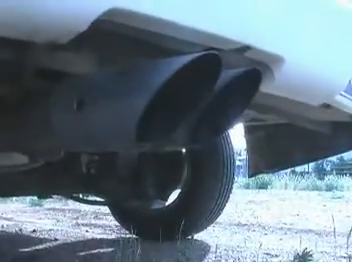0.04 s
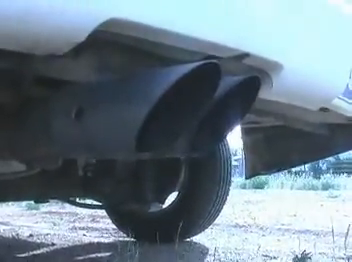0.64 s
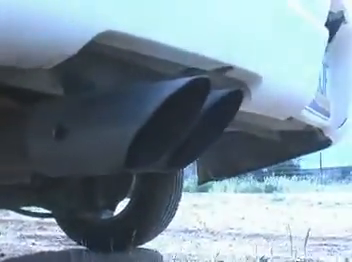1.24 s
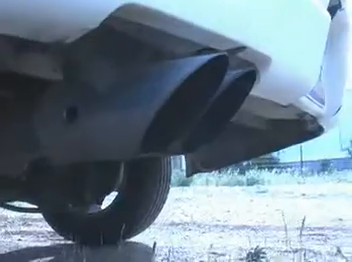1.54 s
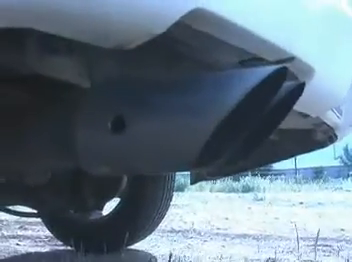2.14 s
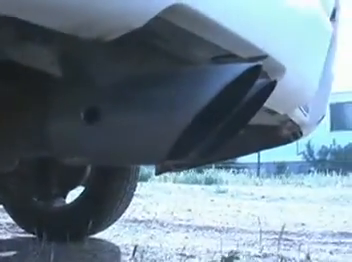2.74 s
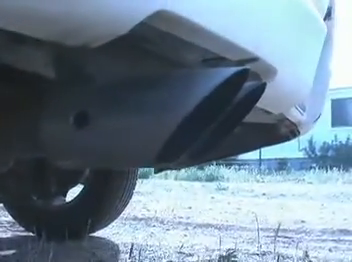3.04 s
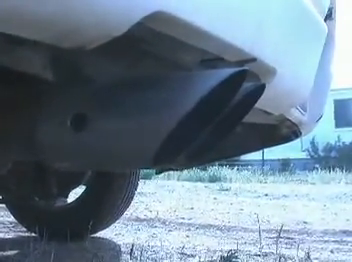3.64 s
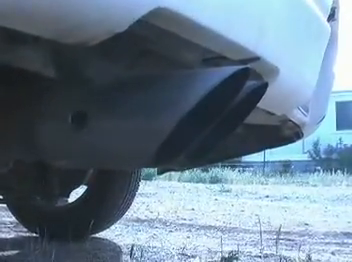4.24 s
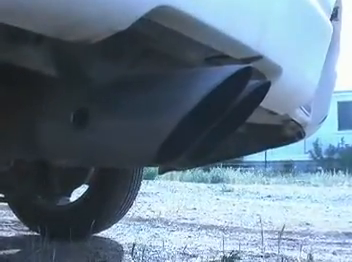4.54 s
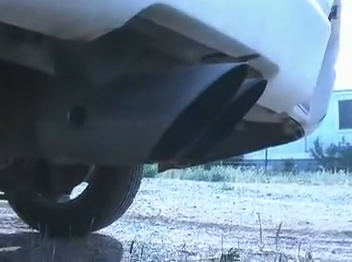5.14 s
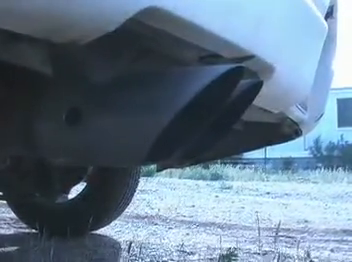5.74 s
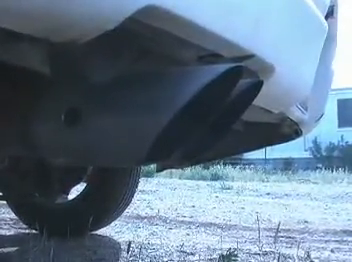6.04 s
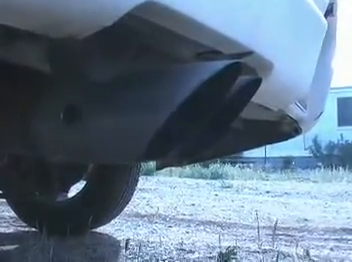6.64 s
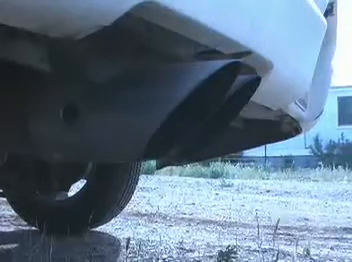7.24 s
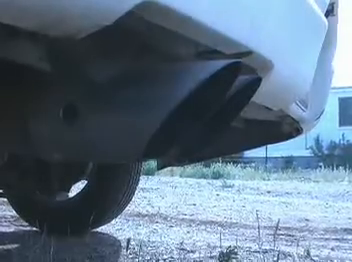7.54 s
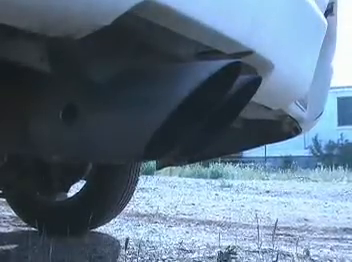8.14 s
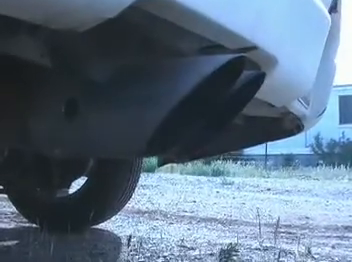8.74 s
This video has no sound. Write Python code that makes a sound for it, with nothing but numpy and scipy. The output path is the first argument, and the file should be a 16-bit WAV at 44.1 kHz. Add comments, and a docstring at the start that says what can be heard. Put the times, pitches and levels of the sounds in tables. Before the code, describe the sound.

A car idles close to its exhaust, loping with sputters and thumps, then surges and settles into an even low drone.

```python
"""A four-cylinder car idles, heard beside its twin tail pipes: each firing is a pressure pulse that
drives the resonances of pipes and silencer. For four seconds it lopes: each misfire spits gas, and the
next firing burns the leftover fuel with a thump; the heaviest overload the microphone. Then the engine
catches, surges and sinks back. The gas hisses faintly, then hard near 5.2 s and 6.6 s. At last it
settles into an even drone with rare misfires, one cylinder ringing the silencer on every cycle."""
import sys
import numpy as np
from scipy import signal
from scipy.fft import rfft, irfft
from scipy.io import wavfile
from scipy.ndimage import uniform_filter1d

SR = 44100
rng = np.random.default_rng(int(sys.argv[2]) if len(sys.argv) > 2 else 0)


def store_wav(level_fs):
    """Save 16-bit WAV to argv[1]."""
    pcm = np.round(np.clip(np.atleast_2d(level_fs), -1, 1) * 32767)
    wavfile.write(sys.argv[1], SR, pcm.T.astype(np.int16))


N = 396018
TIME = np.arange(N) / SR


def undb(db):
    """Amplitude ratio of a level in decibels."""
    return 10 ** (np.asarray(db) / 20)


def unit(x):
    """Normalisation to rms 1."""
    return x / np.sqrt(np.mean(x ** 2))


def steady(x):
    """Normalisation to rms 1 over a sliding half second."""
    return x / np.sqrt(uniform_filter1d(x ** 2, size=SR // 2) + 1e-18)


def cut(x, hz, kind, order):
    """Butterworth low-pass or high-pass."""
    return signal.sosfilt(signal.butter(order, hz, kind, fs=SR, output="sos"), x)


def resonate(x, modes):
    """Superposition of damped modes (frequency [Hz], bandwidth [Hz], gain [dB])."""
    return sum(undb(db) * signal.lfilter(*signal.iirpeak(hz, hz / width, fs=SR), x)
               for hz, width, db in modes)


def coloured(x, response, size=16384):
    """Minimum-phase filter (frequency [Hz], gain [dB]), falling 12 dB an octave past its last point."""
    f = np.maximum(np.arange(size // 2 + 1) * SR / size, 1)
    hz, db = np.transpose(response)
    gain = undb(np.interp(np.log(f), np.log(hz), db)) / np.maximum(f / hz[-1], 1) ** 2
    cepstrum = irfft(np.log(gain))
    cepstrum[1:size // 2] *= 2
    cepstrum[size // 2 + 1:] = 0
    return signal.fftconvolve(x, irfft(np.exp(rfft(cepstrum))))[:N]


def impulses(times, sizes):
    """An impulse train."""
    train = np.zeros(N)
    inside = (times >= 0) & (times < (N - 1) / SR)
    np.add.at(train, (times[inside] * SR).astype(int), sizes[inside])
    return train


def swell(train, rise_s, fall_s):
    """Convolution turns each impulse into a gust that rises and decays exponentially."""
    t = TIME[:SR // 5]
    shape = (1 - np.exp(-t / rise_s)) ** 2 * np.exp(-t / fall_s)
    return signal.fftconvolve(train, shape / shape.max())[:N]


def bursts(times, sizes, length_s):
    """Raised-cosine envelopes of flow that start at the given times."""
    return signal.fftconvolve(impulses(times, sizes), np.hanning(int(length_s * SR)))[:N]


# Stages of the scene: loping, loping with a louder rasp, surging, sinking back, a little faster, even idle.
# (start [s], lope [0-1], cylinder imbalance [0-1], long pipe's share of the boom's power [0-1], boom [dB],
# silencer ring [dB], rasp [dB], gas flow [dB], sputter [dB])
STAGES = [(0, 0.79, 0, 0.26, -12.1, -22, -40, -44.5, -53),
          (1.1, 0.86, 0, 0.22, -11, -22.5, -36.5, -45, -54),
          (3.979, 0.1, .08, 0.19, -12, -22, -35.5, -47, -50),
          (4.751, 0.5, 0.49, 0.45, -13, -19.5, -35, -46, -57),
          (6.12, 0.19, 0.64, 0.59, -11, -21.5, -34, -47.5, -53.5),
          (6.901, 0.11, .62, 0.52, -13, -19, -36, -46, -54.5)]
def stage(name, at=TIME, blend_s=0.19):
    """One setting of the running state, interpolated linearly across each transition."""
    start, *columns = np.transpose(STAGES)
    names = ["lope", "imbalance", "pipe_share", "boom", "ring", "rasp", "gas", "sputter"]
    edges = (start[1:, None] + blend_s * np.array([-.5, .5])).ravel()
    return np.interp(at, edges, np.repeat(columns[names.index(name)], 2)[1:-1])


THUMP_DELAY_S = .0415  # from a misfire to the firing that burns the leftover fuel
# Engine speed once it has caught: (time [s], firing rate [Hz])
FIRING_RATE = [(3.9, 28.09), (4.1, 34.42), (4.5, 36.51), (4.75, 34.97), (5.45, 29.75), (5.95, 30.9),
               (6.3, 32.64), (6.7, 32.36), (7.1, 31.48), (7.8, 30.47), (8.25, 31.45), (8.98, 30.86)]
def firing_times(catch_s=3.902, lope_hz=29.3):
    """Loping firings fill the gaps between thumps; after the catch, phase is the integral of rate."""
    thumps = np.array(MISFIRES)[:, 0] + THUMP_DELAY_S
    marks = np.concatenate([[0], thumps[thumps < catch_s], [catch_s]])
    loping = np.concatenate([np.linspace(a, b, max(round((b - a) * lope_hz), 1), endpoint=False)
                             for a, b in zip(marks, marks[1:])])
    running = TIME[TIME >= catch_s]
    fired = np.cumsum(np.interp(running, *np.transpose(FIRING_RATE))) / SR
    times = np.append(loping, np.interp(np.arange(fired[-1]), fired, running))
    cylinder = (np.arange(len(times)) - len(loping)) % len(CYLINDERS)
    return times, cylinder


# Cylinders in firing order, at full imbalance: (boom [dB], silencer ring [dB], rasp [dB])
CYLINDERS = [(2.5, -15, 1.5), (-1, -7, 1), (-4.5, -6.5, 2.5), (-3.5, 2, 1)]
def firings(jitter_s=0.002, lead_s=.0045, rebound_db=1.5, rebound_s=0.066, miss_db=2.5, push_db=2.5):
    """Cycle-to-cycle variation modulates the pulses: their times and amplitudes (boom, ring, rasp)."""
    times, cylinder = firing_times()
    misfire_s, _, _, thump_db = np.transpose(MISFIRES)
    thump = np.abs(times - (misfire_s + THUMP_DELAY_S)[:, None]).argmin(axis=1)
    lope = stage("lope", times)
    chance = rng.standard_normal((len(times), 4)).T
    pattern_db = stage("imbalance", times) * np.array(CYLINDERS)[cylinder].T
    scatter_db = np.array([[1.6], [4.5], [4.5]]) * np.sqrt(lope) * chance[1:]
    boom_db, ring_db, rasp_db = pattern_db + scatter_db
    since = times - times[thump, None]
    force = np.maximum(thump_db, 0) / thump_db.max()
    rebound = force @ ((since > 0) * np.exp(-np.abs(since) / rebound_s))
    boom_db += lope * (rebound_db * rebound - 0.5)  # fires hard just after a thump, then fades
    boom_db[thump - 2] -= miss_db * (thump_db > 0)  # the firing that fails
    boom_db[thump - 1] += lope[thump] * push_db * (1 + force)  # the spit gives a lesser push
    boom_db[thump] = thump_db
    ring_db += 0.29 * lope * boom_db
    rasp_db += 1.1 * lope * boom_db
    jitter = jitter_s * lope * chance[0]
    jitter[thump] = 0
    return times + jitter - lead_s, undb([boom_db, ring_db, rasp_db])


# Transfer function of the exhaust system: (frequency [Hz], gain [dB])
EXHAUST_RESPONSE = [(18, -58), (31, -18.5), (45, -5), (60, 0), (80, 5.5), (103, 0.5), (113, 8.5),
                    (123, 0.5), (135, -5), (175, 3.5), (208, -19.5), (228, -12), (260, -12.5), (330, -34.5),
                    (600, -69.5)]
def boom(times, sizes, pipe_hz=164, width_hz=25, lead_s=0.00637):
    """Source and filter: each pressure pulse leaves as a deep thud, and the long pipe resonates on."""
    pulses = impulses(times - lead_s, sizes)
    roughness = unit(swell(pulses, 0.0046, 0.052) * rng.standard_normal(N))
    drive = unit(pulses) + 0.42 * (0.45 + stage("lope")) * roughness
    thud = steady(coloured(drive, EXHAUST_RESPONSE))
    pipe = [(pipe_hz, width_hz, 0)]
    hum = steady(resonate(resonate(drive, pipe), pipe))
    share = stage("pipe_share")
    return steady(np.sqrt(1 - share) * thud + np.sqrt(share) * hum)


def silencer(times, sizes, low_hz=286, high_hz=308, echo_s=0.010155):
    """Cavity resonance: a chamber rings hollow after each firing, with thin metallic overtones."""
    pulses = impulses(times, sizes) + 0.61 * impulses(times + echo_s, sizes)  # far-end reflection
    drive = unit(pulses) + .2 * unit(swell(pulses, .002, .015) * rng.standard_normal(N))
    ring = resonate(resonate(drive, [(low_hz, 44, 0)]), [(high_hz, 36, 0)])
    ring = cut(ring, 357, "low", order=4)
    overtones = resonate(drive, [(394.5, 8.7, -13.5), (550, 16, -20), (876.6, 25, 7.5)])
    overtones = cut(overtones, 480, "high", order=3)
    overtone_db = -22 + 5 * (stage("imbalance") - 0.5)  # stronger when one cylinder dominates
    return steady(ring) + undb(overtone_db) * steady(overtones)


# Resonances of the tail pipes: (frequency [Hz], bandwidth [Hz], gain before the low-pass [dB])
TAILPIPE_MODES = [(426.4, 54, 6.5), (538.7, 61, 6.5), (647, 43, -2.5), (860, 100, 1.5), (956, 97, 2),
                  (1069, 35, -2), (1344, 300, -42), (1450, 120, -5), (1995, 120, -0.5)]
def rasp(times, sizes, edge=0.29, flow=0.38):
    """Broadband excitation: each pulse's edge and the turbulence behind it ring the tail pipes."""
    pulses = impulses(times, sizes)
    turbulence = (flow + swell(pulses, 0.00097, 0.013)) * rng.standard_normal(N)
    drive = edge * unit(pulses) + unit(turbulence)
    return steady(cut(resonate(drive, TAILPIPE_MODES), 1044, "low", order=2))


# High pipe resonances that rushing gas excites: (frequency [Hz], bandwidth [Hz], relative level [dB])
HIGH_MODES = [(1650, 110, 3.5), (1790, 70, 1), (2130, 70, -3), (3090, 80, -2), (3440, 140, -4),
              (3800, 90, -6), (4340, 110, 3.5), (4730, 70, -3), (5400, 80, -6), (6150, 120, -7),
              (8120, 160, -6)]
def hiss(spectrum, ring_db):
    """Flow noise lifted at the pipe's modes; left and right lose coherence as frequency rises."""
    f = np.maximum(np.arange(N // 2 + 1) * SR / N, 1)
    hz, db = np.transpose(spectrum)
    gain = undb(np.interp(np.log(f), np.log(hz), db)) * np.minimum(f / hz[0], 1) ** 2
    peaks = sum(undb(ring_db + lift) / (1 + (2 * (f - centre) / width) ** 2)
                for centre, width, lift in HIGH_MODES)
    mid, side = rfft(rng.standard_normal((2, N)))
    spread = np.array([[1], [-1]]) * (0.028 + 0.24 * f / 14000)
    return unit(irfft(gain * (1 + peaks) * (mid + spread * side), N))


# Noise of the outflow: (frequency [Hz], relative spectral density [dB])
GAS_SPECTRUM = [(300, 6), (700, 18), (1300, 13), (2000, 4.5), (2600, 5), (4400, 2.5), (6200, -2.5),
                (8500, -15), (11000, -29), (14500, -22)]
def gas_flow(times, sizes, flow=2.0):
    """Amplitude-modulated flow noise: gas rushes out steadily and surges with each firing."""
    surges = swell(impulses(times, sizes ** .5), 0.011, 0.017)
    return hiss(GAS_SPECTRUM, ring_db=-16) * unit(flow + surges)


# Noise of a spit of gas: (frequency [Hz], relative spectral density [dB])
SPIT_SPECTRUM = [(400, -20), (850, -49.5), (1300, 21), (2500, 12.5), (4000, 12), (6500, 10.5), (9000, 5),
                 (12000, -5), (14500, -30.5)]
def sputter(times, lead_s=0.0052, spread_s=0.0075, length_s=0.013, scatter_db=6.0):
    """Incoherent addition: every firing spits three uneven little bursts whose powers sum."""
    offset, size = rng.standard_normal((len(times), 3, 2)).T
    starts = times - lead_s + spread_s * offset
    sizes = undb(stage("sputter", times) + scatter_db * size)
    power = bursts(starts.ravel(), sizes.ravel() ** 2, length_s)
    return np.sqrt(np.abs(power)) * hiss(SPIT_SPECTRUM, ring_db=-6.5)


def underbody(x, echo_db=-13, decay_s=0.0036):
    """Interference of early reflections between ground and floor pan gives the hiss a hollow colour."""
    t = TIME[:SR // 20]
    echoes = rng.standard_normal(len(t)) * np.exp(-t / decay_s) * (t > .001)
    reflected = signal.fftconvolve(x, echoes[None] / np.linalg.norm(echoes), axes=1)[:, :N]
    return (x + undb(echo_db) * reflected) / np.hypot(1, undb(echo_db))


# Open air around the car: (frequency [Hz], relative spectral density [dB])
AIR_SPECTRUM = [(60, 12.5), (160, 11), (300, -5.5), (550, -10.5), (1000, -30.5), (2000, -42),
                (10000, -29.5), (14500, -44)]
def open_air(level_db=-40.5):
    """A diffuse field: faint rumble and hiss, uncorrelated between left and right."""
    field = np.array([coloured(noise, AIR_SPECTRUM) for noise in rng.standard_normal((2, N))])
    return undb(level_db) * unit(field)


# Misfires, levels relative: (time [s], spit of gas [dB], tail pipe ring [dB], following thump [dB])
MISFIRES = [(0.111, -42, -45, 0.5), (0.283, -36, -52, 1.5), (0.421, -34.5, -49, 4.5),
            (0.526, -29.5, -43, 6.5), (0.671, -36.5, -53, -0.5), (0.811, -30, -36, 8),
            (0.992, -32.5, -38, 0), (1.095, -32.5, -39, 6.5), (1.268, -31.5, -40, 4),
            (1.376, -41, -43, 3.5), (1.55, -35.5, -45, 2), (1.641, -30.5, -36, 6), (1.78, -33, -40, 3.5),
            (1.811, -35, -27, 2.5), (1.913, -35, -31.5, 3), (2.185, -36.5, -29, 5.5),
            (2.251, -41, -37, -0.5), (2.327, -36.5, -41, -1.5), (2.463, -40, -31, 6.5),
            (2.539, -57, -32, 4), (2.742, -31.5, -29, 7.5), (2.914, -34.5, -35, 2),
            (3.052, -39.5, -36, 2.5), (3.259, -37.5, -41, -6.5), (3.321, -33, -35, 6),
            (3.608, -33.5, -33, 7.5), (3.755, -33, -33, 1), (3.789, -32, -22, 3.5), (4.124, -36, -35, 0),
            (4.628, -39, -47, -9), (4.906, -42, -44, 3), (5.384, -34.5, -52, -2.5), (5.411, -33, -26, 4),
            (5.709, -39.5, -36, -2), (5.817, -51, -39, -1), (5.945, -33.5, -48, 0), (7.71, -42, -41.5, 2.5),
            (8.23, -40, -36.5, 1), (8.645, -48, -38, -5.5)]
def misfire_spits(times, length_s=0.021, lead_s=0.006, rebound_s=0.0061, ring_hz=825, ring_s=0.026):
    """Transient excitation: a misfire spits gas and rings the tail pipe at its natural frequency."""
    at, spit_db, ring_db, _ = np.transpose(MISFIRES)
    small = rng.random(len(times)) < .22 * stage("lope", times)  # chance adds small spits to firings
    small_db = (-42.5 + 3 * rng.standard_normal(len(times)))[small]
    at = np.append(at, times[small])
    spit_sizes = undb(np.append(spit_db, small_db))
    ring_sizes = undb(np.append(ring_db, small_db))
    flow = bursts(at - lead_s, spit_sizes, length_s)
    flow += 0.5 * bursts(at + rebound_s, spit_sizes, length_s)  # the flow swings back
    grain = undb(3.83 * unit(uniform_filter1d(rng.standard_normal(N), size=60)))
    t = TIME[:SR // 5]
    ring = np.sin(2 * np.pi * ring_hz * t) * np.exp(-t / ring_s) * (1 - np.exp(-t / 0.0011))
    ringing = signal.fftconvolve(impulses(at, ring_sizes), ring)[:N]
    return undb(-4) * flow * grain * hiss(SPIT_SPECTRUM, ring_db=-25) + ringing


def overload_knocks(gain_db=-16.5, lead_s=0.00449):
    """Microphone overload: each heavy thump distorts into a dry knock, louder the harder the thump."""
    at, _, _, thump_db = np.transpose(MISFIRES)
    peaks = impulses(at + THUMP_DELAY_S - lead_s, undb(thump_db) ** 2)
    return undb(gain_db) * coloured(peaks, [(200, -27.5), (400, 16), (680, 17), (900, 2), (1400, -2.5)])


# Noise of the gas jet: (frequency [Hz], relative spectral density [dB])
JET_SPECTRUM = [(400, 2), (1100, 15.5), (1700, 6.5), (2600, 4.5), (4400, 0), (6500, -4.5), (9000, -8),
                (14500, -27.5)]
# Spells of hiss: (start [s], end [s], level [dB])
JET_SPELLS = [(4.105, 4.665, -50), (4.86, 5.142, -47), (5.135, 5.338, -38), (6.416, 6.883, -38)]
def jets(times, attack_s=0.018, release_s=0.062):
    """Forced resonance: brief jet noise, throbbing with the firings, excites the pipe's high modes."""
    gate = np.zeros(N)
    for start, end, db in JET_SPELLS:
        ramp = np.minimum((TIME - start) / attack_s, (end - TIME) / release_s)
        gate += undb(db) * np.clip(ramp + .5, 0, 1)
    throb = unit(1 + swell(impulses(times, np.ones(len(times))), 0.002, 0.0049))
    return gate * throb * hiss(JET_SPECTRUM, ring_db=11)


def scene():
    """Superposition of the exhaust, almost straight ahead, the overload knocks and the open air."""
    times, (boom_sizes, ring_sizes, rasp_sizes) = firings()
    drone = undb(stage("boom")) * boom(times, boom_sizes)
    ring = undb(stage("ring")) * silencer(times, ring_sizes)
    rasping = undb(stage("rasp")) * rasp(times, rasp_sizes)
    outflow = undb(stage("gas")) * gas_flow(times, boom_sizes)
    hissing = underbody(outflow + sputter(times) + misfire_spits(times))
    balance = undb([[-.2], [.2]])
    return balance * (drone + ring + rasping + hissing + overload_knocks() + jets(times)) + open_air()


def record(dry, left_hz=6, right_hz=11, ceiling=.96, top_hz=14400):
    """Saturation and band limiting: two capsules, unequal in the deep bass, round the highest peaks."""
    heard = np.array([cut(x, hz, "high", order=1) for x, hz in zip(dry, (left_hz, right_hz))])
    rounded = heard / (1 + (heard / ceiling) ** 8) ** (1 / 8)
    return signal.sosfilt(signal.ellip(8, .2, 70, top_hz, fs=SR, output="sos"), rounded)


dry = scene()
out = record(dry)
store_wav(out)
```